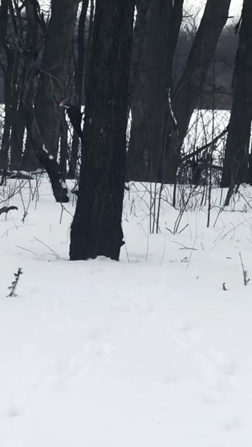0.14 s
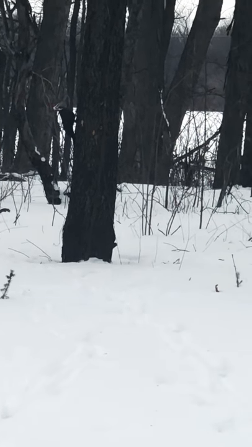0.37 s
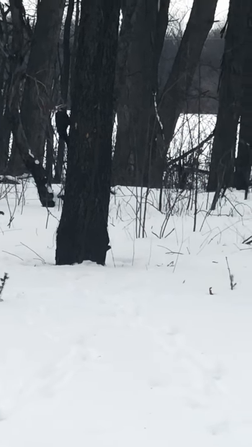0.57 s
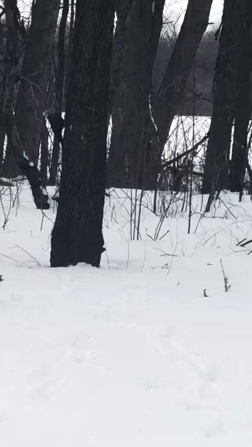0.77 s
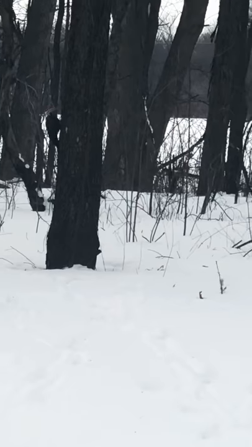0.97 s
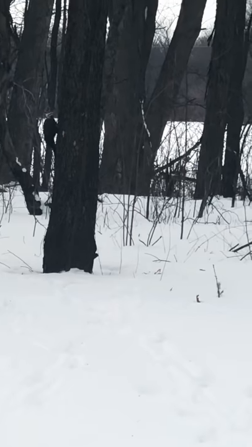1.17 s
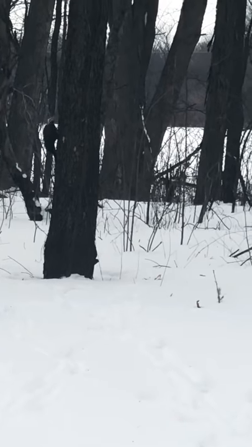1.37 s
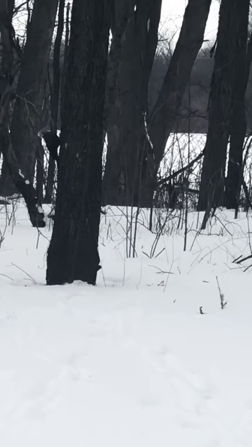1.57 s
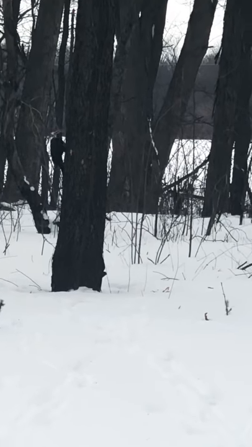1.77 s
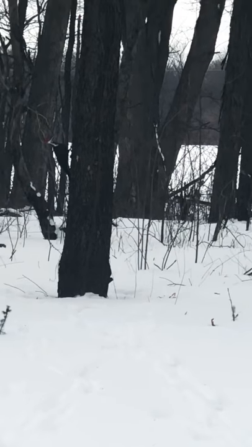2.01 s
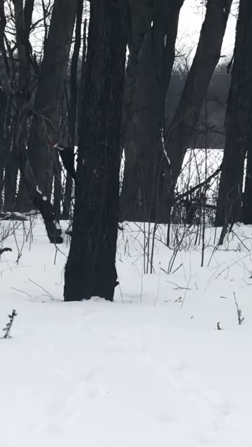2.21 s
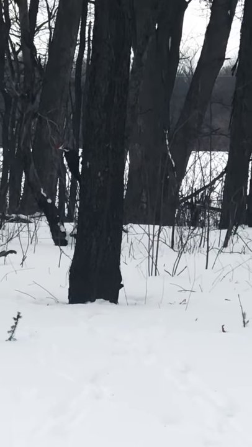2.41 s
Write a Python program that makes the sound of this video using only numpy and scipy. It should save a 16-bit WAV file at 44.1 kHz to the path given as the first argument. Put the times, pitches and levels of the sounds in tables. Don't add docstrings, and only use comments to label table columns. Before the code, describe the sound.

A woodpecker knocks slowly on a tree trunk in a quiet snowy wood.

```python
import sys
import numpy as np
from scipy import signal
from scipy.fft import rfft, irfft
from scipy.io import wavfile
from scipy.ndimage import uniform_filter1d

SR = 44100
rng = np.random.default_rng(int(sys.argv[2]) if len(sys.argv) > 2 else 0)


def to_wav(sig):
    pcm = np.clip(np.atleast_2d(sig), -1, 1) * 32767
    pcm = np.round(pcm).astype(np.int16)
    wavfile.write(sys.argv[1], SR, pcm.T)


def magnitude_from_level(level_db):
    exponent = np.asarray(level_db, float) / 20
    return 10 ** exponent


N = 108045


def evened(x):
    return x / np.sqrt(np.mean(x ** 2) + 1e-20)


def add(mix, start_s, sound):
    part = mix[round(start_s * SR):][:len(sound)]
    part += sound[:len(part)]


def band(x, hz, width_hz):
    r = np.exp(-np.pi * width_hz / SR)
    return signal.lfilter([1, 0, -1], [1, -2 * r * np.cos(2 * np.pi * hz / SR), r * r], x)


def air(shape, patchy_db, bins=8, frames=8):
    hz = np.fft.rfftfreq(1024, 1 / SR)
    real, imag, patches = rng.standard_normal((N // 256 + 5, 513, 3)).T
    patches = uniform_filter1d(uniform_filter1d(patches, bins, 0), frames, 1)
    shape_hz, shape_db = np.transpose(shape)
    level_db = np.interp(np.log(hz + 1), np.log(shape_hz), shape_db, left=-90, right=-90)
    gain = magnitude_from_level(level_db[:, None] + patchy_db * evened(patches))
    return evened(signal.istft((real + 1j * imag) * gain, nperseg=1024, noverlap=768)[1][:N])


# pitch_hz, level_db
RUMBLE_SHAPE = [(13, -68), (22, -25.5), (51, -13.5), (71, 1.5), (102, -10.5), (175, -9.5), (332, -18.5),
                (415, -19.5), (1000, -35.5), (1300, -75), (2200, -120)]
# start_s, level_db
WIND_GUSTS = [
    (0.0, -60.5),
    (0.3, -55.5),
    (0.61, -58),
    (0.8, -57.5),
    (1.18, -58),
    (2.09, -54.5),
    (2.45, -56),
]


def rumble():
    hz = np.fft.rfftfreq(N, 1 / SR)
    shape_hz, shape_db = np.transpose(RUMBLE_SHAPE)
    flat = air([(1, 0), (1100, 0)], patchy_db=2.5, bins=3, frames=3)
    level_db = np.interp(np.log(hz + 1), np.log(shape_hz), shape_db, left=-60, right=-90)
    x = evened(irfft(rfft(flat) * magnitude_from_level(level_db), N))
    start_s, gust_db = np.transpose(WIND_GUSTS)
    gust = magnitude_from_level(np.interp(np.arange(N) / SR, start_s, gust_db - gust_db.mean()))
    low = signal.sosfiltfilt(signal.butter(2, 300, fs=SR, output="sos"), x)
    return magnitude_from_level(-53) * (x - low + gust * low)


# pitch_hz, level_db
HISS_SHAPE = [(470, -35), (800, -6), (1190, -3.5), (1320, -7), (1670, -4.5), (2290, -15.5), (2480, -16),
              (13000, -29)][:-2] + [(14000, -26.5), (15750, -31.5)]
# pitch_hz, width_hz, level_db
FAINT_DRONES = [
    (1595.6, 123, -73.5),
    (8720, 180, -90.5),
]


def hiss():
    x = magnitude_from_level(-68.5) * air(HISS_SHAPE, patchy_db=.4)
    for pitch_hz, width_hz, level_db in FAINT_DRONES:
        drift = uniform_filter1d(rng.standard_normal(N), size=2500)
        waver_db = 2.0 * evened(uniform_filter1d(drift, size=2500))
        tone = band(band(rng.standard_normal(N), pitch_hz, width_hz), pitch_hz, width_hz)
        x = x + magnitude_from_level(level_db + waver_db) * evened(tone)
    return x


# start_s, level_db, bright_hz, low_hz
HAND_BUMPS = [
    (.224, -32.5, 204, 78.6),
    (.246, -28.5, 230, 79),
    (0.2681, -25, 344, 68),
    (0.308, -36.5, 209, 91),
    (0.316, -38, 443, 262),
    (.316, -36.5, 216, 80),
    (.870, -37.5, 280, 142),
    (0.9318, -30.5, 435, 235),
    (.935, -28.5, 200, 98),
]
# start_s, level_db, bright_hz
HAND_NUDGES = [(0.431, -64, 300), (.68, -47.5, 225), (0.743, -47, 222), (1.011, -50.5, 287),
               (1.182, -45.5, 129), (1.416, -47, 150), (1.625, -44, 150), (1.682, -42, 300),
               (1.817, -46, 184), (2.103, -43.5, 305), (2.134, -48, 200), (2.208, -47, 150)]


def bump(start_s, level_db, bright_hz, low_hz=67):
    case_hz, case_db = 150, 8
    lead_s = .02
    hz = np.fft.rfftfreq(8192, 1 / SR) + 1
    lag_s = .0125 * (case_hz / np.maximum(hz, 100)) ** 1.6 + lead_s
    case = 1 + magnitude_from_level(case_db) * np.exp(-np.log(hz / case_hz) ** 2 / 0.13)
    gain = case / (1 + (low_hz / hz) ** 6) / (1 + (hz / bright_hz) ** 4.93)
    x = irfft(gain * np.exp(-2j * np.pi * np.cumsum(lag_s) * SR / 8192))
    return start_s - lead_s, magnitude_from_level(level_db) * x / abs(x).max()


def snap(peak_s, hz, width_hz):
    t = np.arange(400) / SR
    swell = (t / peak_s) * np.exp(1 - t / peak_s)
    x = band(rng.standard_normal(400) * swell, hz, width_hz)
    return x / abs(x).max()


# start_s, level_db, pitch_hz
BARK_FLAKES = [
    (0.5017, -66, 2800),
    (.783, -65, 4100),
    (.876, -71, 7500),
    (0.93, -68, 3550),
    (1.754, -66, 5660),
    (1.8108, -62.5, 2880),
    (1.8305, -61.5, 4200),
]


def flake(start_s, level_db, pitch_hz):
    return start_s, magnitude_from_level(level_db + 5) * snap(.0006, pitch_hz, .17 * pitch_hz)


# start_s, level_db, upper_db, hollow_db, tick_db (the last three relative)
BILL_KNOCKS = [
    (0.5701, -34.5, -13, -13, -15.5),
    (1.0116, -32.5, -25.5, -8.5, -22.5),
    (1.279, -31.5, -13.5, -7, -23),
    (1.5394, -35, -10.5, -5, -22),
    (1.8113, -34, -28, -14, -17),
]
# pitch_hz, level_db, t60_s
TRUNK_RINGS = [
    (1160, 3.5, 0.043),
    (1510, -33, 0.0068),
]


def knock(start_s, level_db, upper_db, hollow_db, tick_db):
    contact_s, swell_s = .003, .0016
    tick_s, tick_lead_s = .0005, .0016
    upper_ring_db, hollow_ring_db, hollow_t60_s = upper_db + 5, hollow_db + 6, .012
    t = np.arange(4000) / SR
    since = t - contact_s
    modes = [*TRUNK_RINGS,
             (2260, upper_ring_db, .013),
             (700, hollow_ring_db, hollow_t60_s),
             (1346, -13 - 1.3 * hollow_db, 0.011),
             (507, hollow_ring_db - 9.5, hollow_t60_s)]
    detune = 1 + .005 * rng.standard_normal(len(modes))
    ring = np.zeros(len(t))
    for (hz, mode_db, t60_s), k in zip(modes, detune):
        fade = magnitude_from_level(mode_db - 60 * np.maximum(since, 0) / t60_s)
        ring += fade * np.cos(2 * np.pi * hz * k * since)
    ring = ring * (1 - np.exp(-(t / swell_s) ** 2))
    crack = magnitude_from_level(upper_db - 2 - 60 * t / 0.0042) * np.sin(2 * np.pi * 3700 * t) * np.minimum(t / tick_s, 1)
    tick = signal.lfilter(*signal.butter(2, 14500, fs=SR), snap(tick_s, 5500, 12000))
    out = np.zeros(4200)
    add(out, tick_lead_s / 4, ring / abs(ring).max() + crack)
    add(out, 0, magnitude_from_level(tick_db + 3.5) * tick)
    return start_s - tick_lead_s, magnitude_from_level(level_db) * out


# start_s, pitch_hz, level_db
BIRD_CHIRPS = [
    [(.803, 7200, -78.5), (.81, 7400, -74), (.82, 7620, -66), (.834, 7670, -64), (.848, 7600, -69),
     (.864, 7300, -62), (.873, 6900, -70), (.878, 5700, -80)],
    [(.941, 6000, -97), (.947, 6350, -69), (.955, 6650, -66.5), (.968, 6690, -59.5), (.977, 6600, -65),
     (.983, 6100, -64), (.99, 5250, -71.5), (.997, 4500, -87), (1.004, 3700, -84)],
]


def chirp(points):
    s, hz, db = np.transpose(points)
    t = np.arange(s[0], s[-1], 1 / SR)
    pitch_hz = uniform_filter1d(np.interp(t, s, hz), size=120)
    phase = 2 * np.pi * np.cumsum(pitch_hz) / SR
    octave = magnitude_from_level(-23 + 10.5 * (hz.max() - pitch_hz) / 1000)
    edge = np.minimum(1, np.minimum(t - s[0], s[-1] - t) / .003)
    whistle = np.sin(phase) + octave * np.sin(2 * phase)
    return s[0], np.sqrt(2) * edge * magnitude_from_level(np.interp(t, s, db)) * whistle


def trees(x, t60_s):
    gap_s = .015
    t = np.arange(SR // 2) / SR
    hits = rng.standard_normal(len(t)) * (rng.random(len(t)) < .3)
    taps = hits * magnitude_from_level(-60 * t / t60_s) * np.clip(t / gap_s - .5, 0, 1)
    return signal.fftconvolve(x, taps / np.linalg.norm(taps))[:N]


def scene():
    near, pecks, bird = np.zeros((3, N))
    for row in [*HAND_BUMPS, *HAND_NUDGES]:
        add(near, *bump(*row))
    for row in BARK_FLAKES:
        add(near, *flake(*row))
    for row in BILL_KNOCKS:
        add(pecks, *knock(*row))
    for points in BIRD_CHIRPS:
        add(bird, *chirp(points))
    echoes = magnitude_from_level(-8.5) * trees(bird, t60_s=.75) + magnitude_from_level(-22) * trees(pecks, t60_s=.35)
    return (rumble() + hiss() + near + pecks + bird + echoes)[None]


def band_limit(x):
    return signal.sosfilt(signal.butter(12, 16040, fs=SR, output="sos"), x)


def record(dry):
    edge = signal.firwin(511, 16050, window=("kaiser", 9), fs=SR)
    mix = signal.oaconvolve(dry, edge[None], "same")
    return band_limit(mix)


dry = scene()
out = record(dry)
to_wav(out)
```